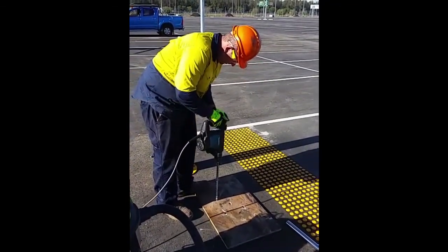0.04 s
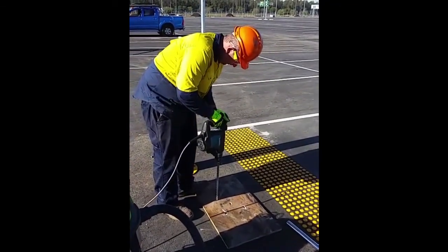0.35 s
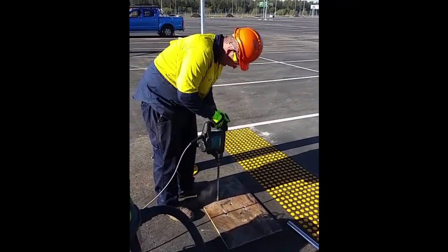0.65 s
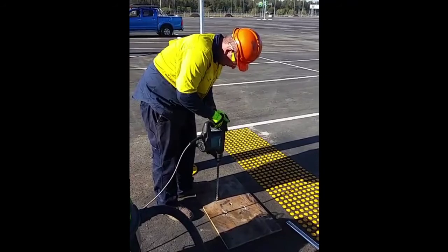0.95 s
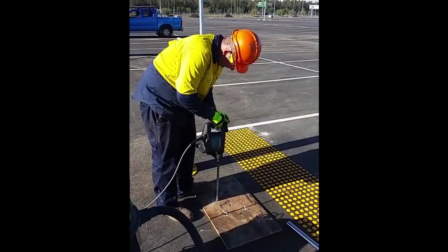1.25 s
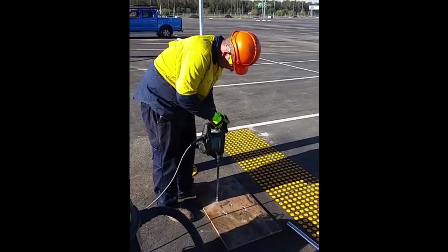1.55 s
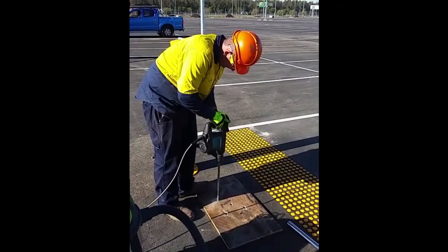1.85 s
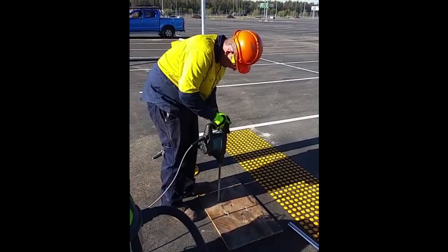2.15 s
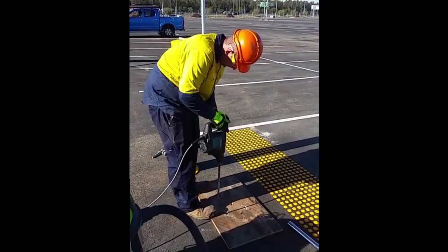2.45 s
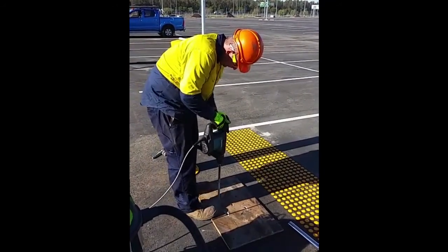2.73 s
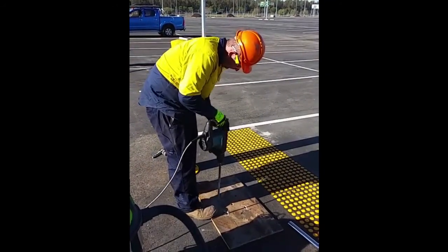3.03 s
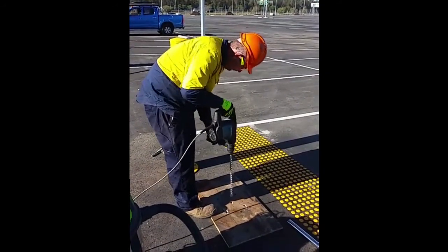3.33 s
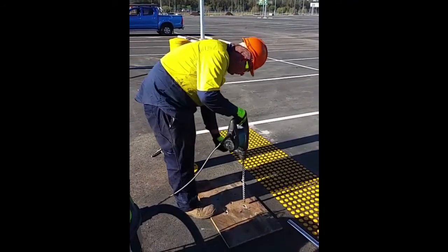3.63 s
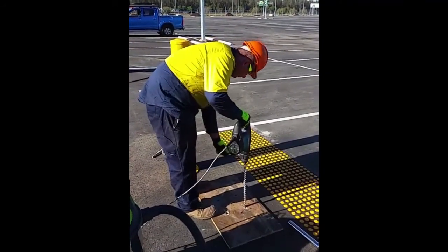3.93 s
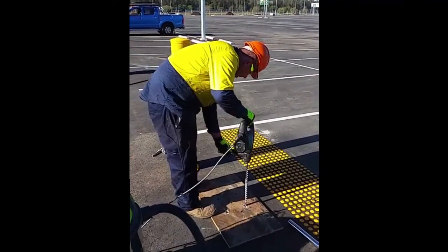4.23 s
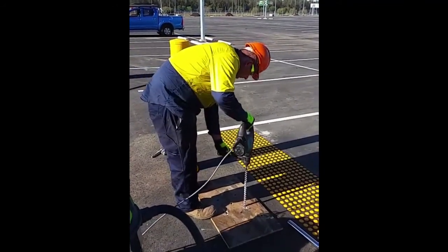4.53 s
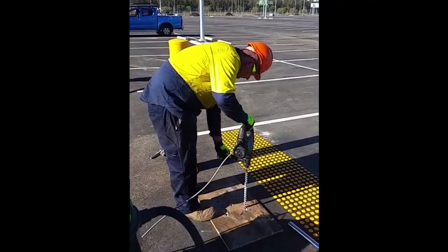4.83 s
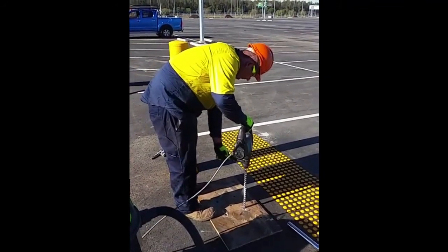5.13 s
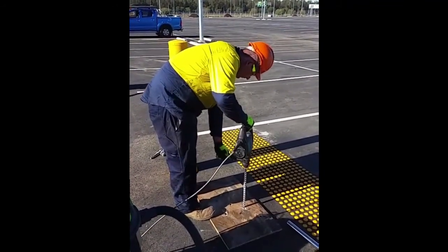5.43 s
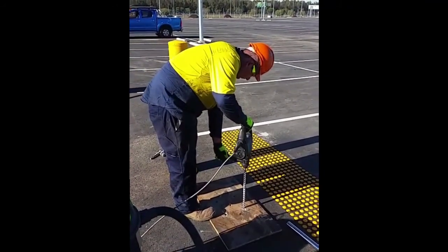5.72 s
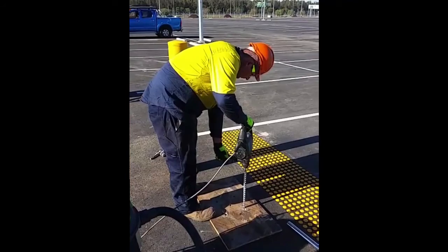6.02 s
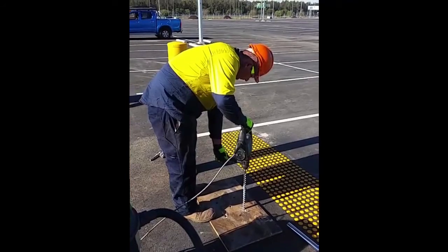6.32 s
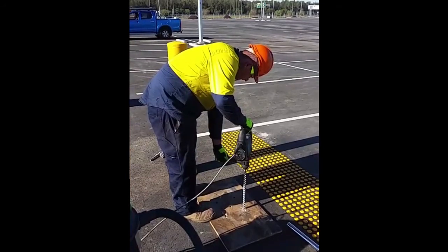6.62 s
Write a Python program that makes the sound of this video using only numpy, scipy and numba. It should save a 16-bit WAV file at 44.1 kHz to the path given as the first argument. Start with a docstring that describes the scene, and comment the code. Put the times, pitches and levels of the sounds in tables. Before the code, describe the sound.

Over a steady generator hum, an electric hammer drill pounds concrete, winds down with a rattle, then starts hammering again.

```python
"""A generator drones close by in a concrete car park; a thin high ring is already sounding, two ticks follow.
A corded hammer drill runs up and its piston strikes the steel bit 54 times a second; it rings, harder and
softer as it turns. An automatic gain control pushes the drone down under the drilling. Near 3 s the bit
lifts clear, the motor coasts down with a rattle and the drone swells back. Near 5 s a second hole begins."""
import sys
import numpy as np
from scipy import signal
from scipy.fft import rfft, irfft, next_fast_len
from scipy.io import wavfile
from scipy.ndimage import uniform_filter1d, minimum_filter1d, map_coordinates
from numba import njit

SR = 44100
rng = np.random.default_rng(int(sys.argv[2]) if len(sys.argv) > 2 else 0)


def materialize(psi):
    """Save the field psi as 16-bit PCM at rate SR to the path in sys.argv[1].

    A 1-D psi becomes a single channel; in a 2-D psi each row is a channel.
    """
    bounded = np.clip(np.atleast_2d(psi).T, -1, 1)
    quanta = np.round(bounded * 32767).astype(np.int16)
    wavfile.write(sys.argv[1], SR, quanta)


N = 302967
TIME = np.arange(N) / SR


def amp(db):
    """Decibels as an amplitude ratio."""
    return 10 ** (np.asarray(db) / 20)


def unit(x, during=slice(None)):
    """Normalisation to rms 1 over the chosen samples."""
    return x / np.sqrt(np.mean(x[during] ** 2) + 1e-20)


def wobble(rate):
    """Random modulation: a smooth curve with rate knots a second."""
    return map_coordinates(rng.standard_normal(int(N * rate / SR) + 4), [TIME * rate])


def filtered(x, response):
    """Linear filtering: the spectrum of x times a frequency response."""
    size = next_fast_len(N + SR // 2)
    return irfft(rfft(x, size) * response(np.fft.rfftfreq(size, 1 / SR)), size)[:N]


def noise(spectrum):
    """Spectral shaping: white noise coloured by (Hz, dB) points, at rms 1."""
    points_hz, db = np.transpose(spectrum)
    colour = lambda hz: amp(np.interp(np.log(hz + 1), np.log(points_hz), db))
    return unit(filtered(rng.standard_normal(N), colour))


def ring(x, modes, skirt_hz):
    """Forced resonance: x drives damped modes, each confined to its own part of the spectrum."""
    def mode(hz, centre, width, db):
        resonance = 1j * hz * width / (centre ** 2 - hz ** 2 + 1j * hz * width)
        return amp(db) * resonance / (1 + ((hz - centre) / skirt_hz) ** 2)
    return filtered(x, lambda hz: sum(mode(hz, *row) for row in modes))


def fading(hits, t60, delay=0):
    """Exponential decay: an envelope that jumps at each hit and falls 60 dB in t60 seconds."""
    t = np.arange(SR // 8) / SR - delay
    return signal.fftconvolve(hits, (t >= 0) * amp(-60 * np.abs(t) / t60))[:N]


def bursts(hits, t60, delay=0):
    """Impact noise: a decaying burst of white noise for each hit."""
    return rng.standard_normal(N) * fading(hits, t60, delay)


def impulses(events):
    """Impulsive excitation: one impulse for each (s, dB) row."""
    seconds, db = np.transpose(events)
    return np.bincount(np.round(seconds * SR).astype(int), amp(db), N)[:N]


# Engine and fan tones. Each row: multiple of the firing rate, relative level in dB.
ENGINE_ORDERS = [(1, 1), (2, -13.5), (3, -42.5), (4, -34), (5, -41.5), (6, -37.5), (8, -44), (4.3, -22.5)]
# Engine rumble. Each row: frequency in Hz, relative spectral density in dB.
RUMBLE_SPECTRUM = [(20, -28.5), (45, -9), (100, -3.5), (215, -3.5), (255, -8), (340, -9), (440, -25),
                   (800, -23), (1200, -32.5), (2200, -38), (2750, -44.5), (3200, -50), (3800, -44),
                   (5400, -59.5), (7000, -80), (16000, -90.5)]
def generator(speed, firing_hz=80.07, sag_hz=.85):
    """Periodic firing gives tones and modulates a rumble; the drill's load lowers the pitch."""
    phase = 2 * np.pi * np.cumsum(firing_hz - sag_hz * speed) / SR + 0.05 * wobble(23)
    tones = sum(amp(db + 0.068 * order * wobble(22)) * np.sin(order * phase + rng.uniform(0, 2 * np.pi))
                for order, db in ENGINE_ORDERS)
    rumble = noise(RUMBLE_SPECTRUM) * (1 + 0.2 * np.cos(phase)) * amp(0.51 * wobble(30))
    return amp(-6.05) * tones + amp(-22) * rumble


STROKE_HZ = 54.088  # piston rate at governed speed
def spin(trigger, spin_up, first_blow, release, lift_off, brake_s=.3515, coast_hz_per_s=24.5):
    """Rotational inertia: speed, as a share of full, runs up, is braked by the hole, then coasts."""
    progress = np.maximum(TIME - trigger, 0) / spin_up
    overshoot = .0567 * np.exp(-((progress - 2.54) / .415) ** 2)  # the governor overshoots once
    driven = 1 - np.exp(-progress ** 2) + overshoot
    braked = np.exp(-((np.clip(TIME, release, lift_off) - release) / brake_s) ** 2)
    coasting_loss = coast_hz_per_s / STROKE_HZ * np.maximum(TIME - lift_off, 0)
    return np.maximum(driven * braked - coasting_loss, 0)


def strokes(timing, offset=0):
    """Phase is the integral of rate: stroke times from the first blow, offset by a share of a stroke."""
    turning = spin(*timing) * (TIME >= timing[2])
    count = np.cumsum(turning) * STROKE_HZ / SR
    return np.interp(np.arange(offset, count[-1], 1), count[turning > 0], TIME[turning > 0])


# The two holes. Each row, in seconds: trigger pull, spin-up time, first blow, release, lift of the bit.
HOLE_TIMINGS = [(.2055, .1729, .3196, 2.93, 3.15), (4.9393, .1795, 5.0309, 7, 7.2)]
# Brushes and cooling air. Each row: frequency in Hz, relative spectral density in dB.
AIR_SPECTRUM = [(200, -32), (500, -10.5), (900, -2.5), (1400, -4.5), (2250, -0.5), (2900, -3.5),
                (3600, -7.5), (4200, -14), (5500, -10), (7000, -36.5), (9000, -34.5), (11600, -2),
                (14400, -14.5), (16000, -34)]
# Motor casing. Each row: frequency in Hz, bandwidth in Hz, relative level in dB.
CASING_MODES = [(1590, 290, 0), (2170, 540, 1), (2656, 250, 5), (3290, 380, -7), (3670, 320, -6),
                (5230, 790, -18)]
def motor(speed, hiss_db=-67.5, inrush_peak_s=0.25):
    """Air and bearing noise follow power laws of speed; inrush makes the casing growl at each start."""
    air_level = amp(-20 + 2.3 * wobble(110)) * speed ** 2.02
    air = (air_level + amp(hiss_db)) * noise(AIR_SPECTRUM)
    bearings = amp(-36) * speed ** 0.56
    ages = [np.maximum(TIME - trigger, 0) / inrush_peak_s for trigger, *_ in HOLE_TIMINGS]
    inrush = amp(-34) * sum(age * np.exp(1 - age) for age in ages)
    flutter = amp(0.57 * wobble(40))
    casing = unit(ring(rng.standard_normal(N), CASING_MODES, skirt_hz=603))
    return air + (bearings + inrush) * flutter * casing


# A thin high ring is already sounding at the start; two light ticks follow.
# Each row: time in seconds, relative level in dB.
OPENING_ONSETS = [(.004, -30), (.085, -35), (.16, -44)]
# Thin ring of the loose bit. Each row: frequency in Hz, bandwidth in Hz, relative level in dB.
LOOSE_BIT_MODES = [(6970, 25, -27), (10700, 24, -6), (12500, 30, -11), (14150, 14, 14)]
def thin_ring_and_ticks():
    """Light damping: high modes ring from the start, and two ticks excite them again."""
    onsets = impulses(OPENING_ONSETS)
    return amp(-6) * bursts(onsets, t60=.014) + amp(37) * ring(onsets, LOOSE_BIT_MODES, skirt_hz=900)


# The bit leaves the first hole. Each row: time in seconds, impulse level in dB.
LIFT_IMPULSE = [(3.146, 37.5)]
def lift():
    """Free vibration: clear of the concrete, the bit's longitudinal modes ring on."""
    modes = [(5580, 9.7, 5.5), (11285, 9.8, 12), (7300, 28, -19), (15220, 28, -8)]
    return ring(impulses(LIFT_IMPULSE), modes, skirt_hz=900)


# Gearbox. Each row: frequency in Hz, bandwidth in Hz, relative level in dB.
GEARBOX_MODES = [(2330, 86, 3), (2723, 320, 3), (3530, 770, -3.5), (5400, 530, -11)]
def rattle(timing):
    """Impact excitation: the idle piston clacks in the gears twice a stroke, ever slower and softer."""
    times = np.concatenate([strokes(timing), strokes(timing, offset=.41)])
    times = times[times > timing[4]]  # once the bit is lifted
    scatter_db = 2.5 * np.clip(rng.standard_normal(len(times)), -2, 2)
    clacks = impulses(np.column_stack([times, scatter_db])) * spin(*timing) ** 1.68
    return ring(bursts(clacks, t60=0.015), GEARBOX_MODES, skirt_hz=552)


def piston_return(returns):
    """Delayed excitation: the returning piston rings the gearbox just after each blow."""
    return ring(bursts(returns, t60=0.051, delay=.012), GEARBOX_MODES, skirt_hz=800)


# The housing in each grip. Each row: frequency in Hz, bandwidth in Hz, relative level in dB.
FIRST_GRIP_MODES = [(460, 130, -10), (818, 100, -2), (1337, 120, -7.5), (1880, 60, 4.5), (2295, 160, -18.5),
                    (2580, 170, -4), (3693, 87, -1)]
SECOND_GRIP_MODES = [(564, 51, -4), (730, 150, -1.5), (1440, 43, -5), (1913, 72, 2), (2110, 69, -3),
                     (2810, 97, -5), (3580, 27, 1)]
def housing_knock(knocks, modes):
    """Structure-borne sound: each blow drives the housing's modes with an impulse and a little noise."""
    return ring(knocks + 0.053 * bursts(knocks, t60=0.031), modes, skirt_hz=600)


# Concrete being crushed. Each row: frequency in Hz, relative spectral density in dB.
GRIT_SPECTRUM = [(200, 6), (700, -4.5), (1300, -21.5), (3500, -1.5), (4400, -7), (6300, 2), (7100, -13.5),
                 (8200, -11.5), (9500, -6), (10500, 2), (12300, 0.5), (14300, 3.5), (14900, -10.5),
                 (16000, -14)]
def crushed_grit(blows):
    """Fracture noise: each blow crushes concrete in a short broadband burst."""
    return noise(GRIT_SPECTRUM) * fading(blows, t60=0.092)


def metallic_ring(times, forces, modes, attack_s=.001, choke=0.89):
    """Modal superposition: each blow rings every mode at a new strength until the concrete damps it."""
    t = np.arange(SR // 25) / SR
    at = np.round(times * SR).astype(int)
    since_blow = t + (at / SR - times)[:, None]
    rings = 0
    for hz, width, db in modes:
        envelope = (1 - np.exp(-t / attack_s)) * np.exp(-(choke * width * t) ** 2)
        strength = forces * amp(db + .7 * rng.standard_normal(len(at))) * width
        rings = rings + strength[:, None] * envelope * np.sin(2 * np.pi * hz * since_blow)
    out = np.zeros(N + len(t))
    np.add.at(out, at[:, None] + np.arange(len(t)), rings)
    return out[:N]


def low_shelf(tip, speed, curve, slow_boost_db=9):
    """Spectral balance: the bit's lower modes follow a level curve, and slow blows favour them."""
    low = filtered(tip, lambda hz: 1 / (1 + (hz / 6500) ** 20))
    boost_db = np.interp(TIME, *np.transpose(curve)) + slow_boost_db * (1 - speed)
    return tip + (amp(boost_db) - 1) * low


# Metallic ringing of the drilling in each hole. Each row: frequency in Hz, bandwidth in Hz, relative level in
# dB.
FIRST_RING_MODES = [(5224, 180, -14.5), (5640, 140, -8), (6750, 110, -15.5), (7310, 150, -18.5),
                    (8640, 57, -19.5), (10600, 200, -60.5), (11327, 160, 9.5), (11650, 160, -7.5),
                    (11800, 300, -25), (13250, 170, -8), (14480, 170, -28), (15400, 95, -7.5)]
SECOND_RING_MODES = [(5124, 69, -9), (5193, 90, -15), (5620, 82, -11), (6755, 83, -19), (7450, 100, -28.5),
                     (8740, 42, -22), (11100, 110, -38), (11322, 90, 2), (11160, 97, -13), (12500, 53, -8),
                     (15100, 150, -24), (15270, 80, -18)]
# The bit's sound below 6.5 kHz in each hole. Each row: time in seconds, gain at full speed in dB.
FIRST_LOW_CURVE = [(.4, 1), (.7, 6), (1.1, 5), (1.8, 3), (3.1, 4.5)]
SECOND_LOW_CURVE = [(5.2, -4.5), (5.55, 2), (6.2, 1.5), (6.87, 0.5)]
def hammering(timing, ring_modes, grip_modes, low_curve, bite_start, swing_db, tip_db, sink_db_per_s,
              chatter_db, grit_db, housing_db, piston_db):
    """Periodic impact: the piston drives bit, concrete and housing; rotation modulates the blows."""
    _, _, first_blow, _, lift_off = timing
    running = (TIME >= first_blow) & (TIME <= lift_off)
    speed = spin(*timing)
    times = strokes(timing)
    times = times[times <= lift_off]
    at = np.round(times * SR).astype(int)
    blow_scatter, knock_scatter, return_scatter = rng.standard_normal((len(at), 3)).T
    # the turning edges bite for about four blows and slip on the fifth
    bite_cycles = .1905 * np.arange(len(at)) + bite_start
    bite = np.pi * np.abs(np.cos(np.pi * bite_cycles)) - 2
    blows = np.bincount(at, amp(swing_db * bite + .5 * blow_scatter), N)
    knocks = np.bincount(at, amp(knock_scatter), N)
    returns = np.bincount(at, amp(3.8 * np.clip(return_scatter, -2, 2)), N)
    jitter_s = 6e-6 * rng.standard_normal(len(at))
    ringing = unit(metallic_ring(times + jitter_s, blows[at], ring_modes), running)
    # chatter in the chuck and crushed grit depend less on the bite, so weak blows sound rougher
    evened_blows = np.sqrt(blows)
    chatter = unit(ring(bursts(evened_blows, t60=.03), ring_modes, skirt_hz=1050), running)
    grit = unit(crushed_grit(evened_blows), running)
    tip = amp(-3.5) * ringing + amp(chatter_db) * chatter + amp(grit_db) * grit
    # the hole muffles the bit as it sinks in
    boring_s = np.clip(TIME, first_blow, lift_off) - first_blow
    tip = amp(tip_db - sink_db_per_s * boring_s) * low_shelf(tip, speed, low_curve)
    housing = unit(housing_knock(knocks, grip_modes), running)
    piston = unit(piston_return(returns), running)
    force = np.minimum(speed / 0.9, 1) ** 2.3  # full force from 90 % of full speed
    return force * (tip + amp(housing_db) * housing + amp(piston_db) * piston)


@njit
def follow(x, attack_s, release_s):
    """First-order lag: tracks x with one time constant upwards and another downwards."""
    out = np.zeros(len(x))
    for i in range(1, len(x)):
        gap = x[i] - out[i - 1]
        out[i] = out[i - 1] + gap / (SR * (attack_s if gap > 0 else release_s))
    return out


def gain_control(x, threshold_db=-26.5, slope=0.73, hold_s=0.82, held_share=0.69):
    """Compression: loud treble turns everything down; part of the cut is held before it lets go."""
    treble = filtered(x, lambda hz: hz > 4500)
    level_db = 10 * np.log10(np.abs(uniform_filter1d(treble ** 2, size=SR // 11)) + 1e-12)
    cut_db = slope * np.maximum(level_db - threshold_db, 0)
    half = int(hold_s * SR / 2)
    held_db = -minimum_filter1d(-cut_db, 2 * half + 1, origin=half, mode="constant")
    target_db = held_share * held_db + (1 - held_share) * cut_db
    return x * amp(-follow(target_db, attack_s=0.006, release_s=0.1))


def scene():
    """Superposition of generator, motor and both holes, coupled by the motor's speed."""
    speed = sum(spin(*timing) for timing in HOLE_TIMINGS)
    first = hammering(HOLE_TIMINGS[0], FIRST_RING_MODES, FIRST_GRIP_MODES, FIRST_LOW_CURVE,
                      bite_start=.15, swing_db=1.8, tip_db=-1.5, sink_db_per_s=2.25,
                      chatter_db=-1, grit_db=-14.5, housing_db=-21.5, piston_db=-23)
    second = hammering(HOLE_TIMINGS[1], SECOND_RING_MODES, SECOND_GRIP_MODES, SECOND_LOW_CURVE,
                       bite_start=-.42, swing_db=0.5, tip_db=-4, sink_db_per_s=2.56,
                       chatter_db=0.5, grit_db=-10, housing_db=-23, piston_db=-25)
    return (generator(speed) + motor(speed) + thin_ring_and_ticks() + first + lift()
            + rattle(HOLE_TIMINGS[0]) + second)[None]


def record(dry, fade_in_s=.004, top_hz=16000):
    """Band limiting: a steep low-pass follows a short fade-in and the gain control."""
    x = gain_control(dry[0] * np.minimum(TIME / fade_in_s, 1))
    return filtered(x, lambda hz: 1 / np.sqrt(1 + (hz / top_hz) ** 160))[None]


dry = scene()
out = record(dry)
materialize(out)
```